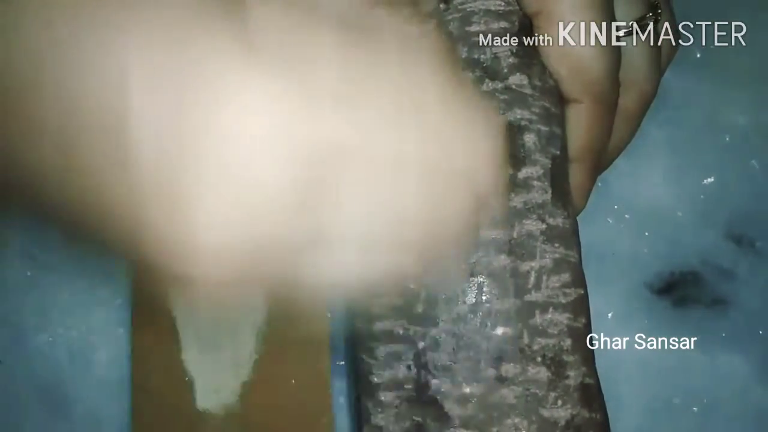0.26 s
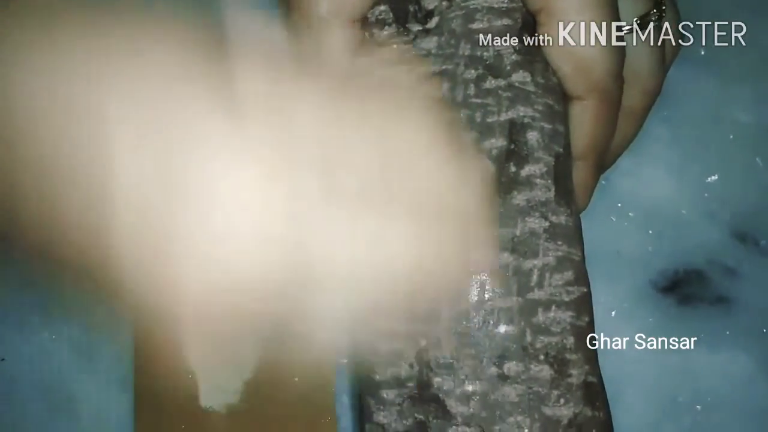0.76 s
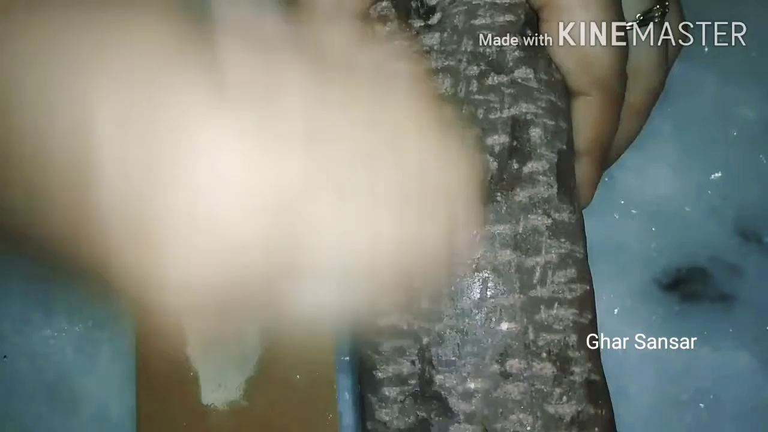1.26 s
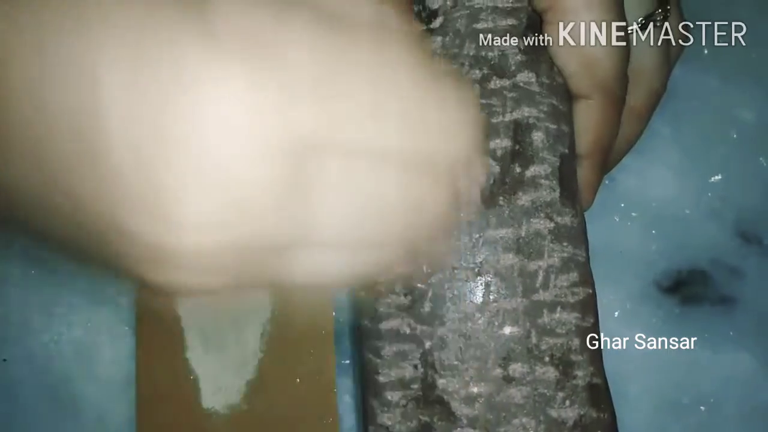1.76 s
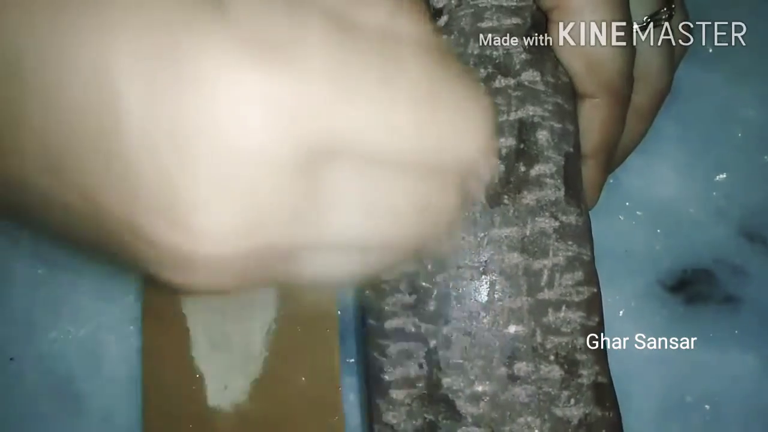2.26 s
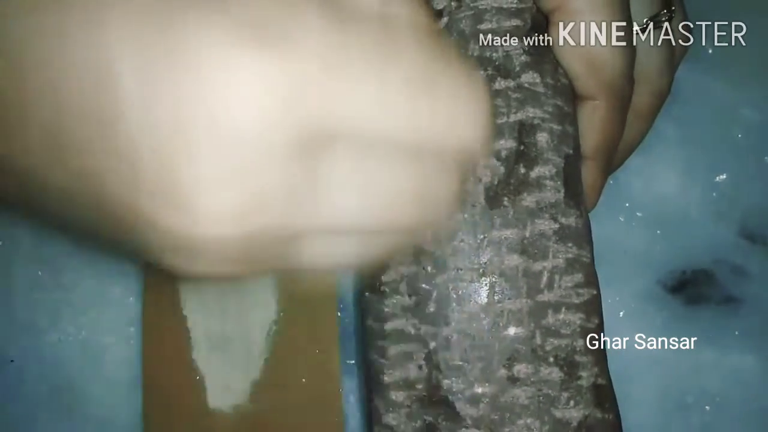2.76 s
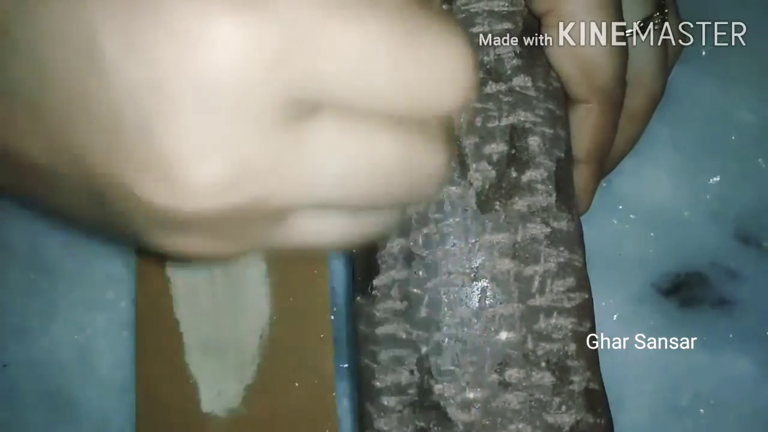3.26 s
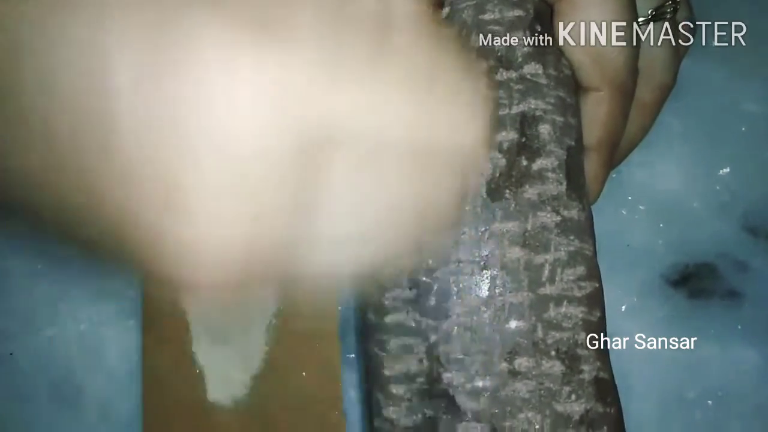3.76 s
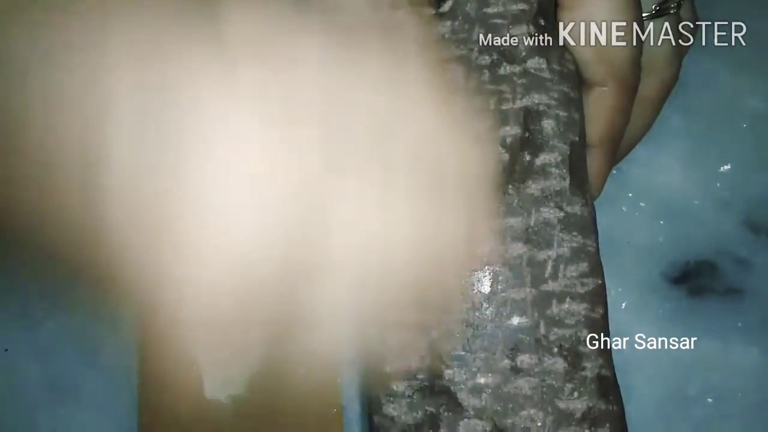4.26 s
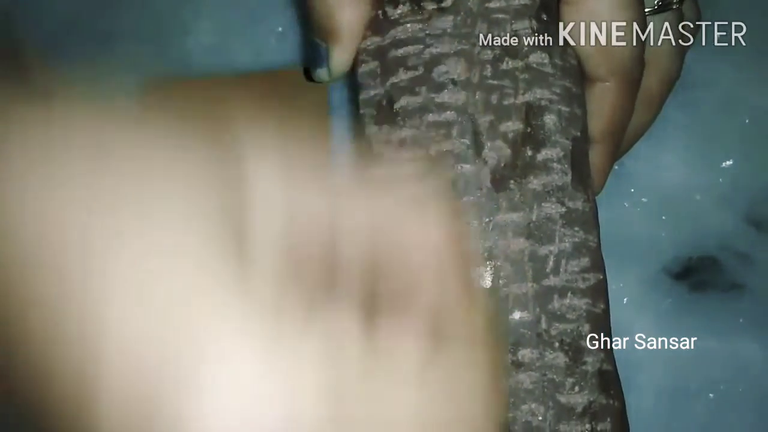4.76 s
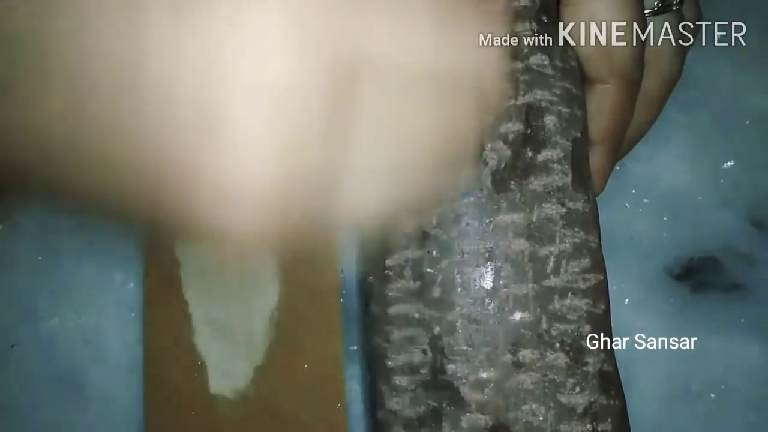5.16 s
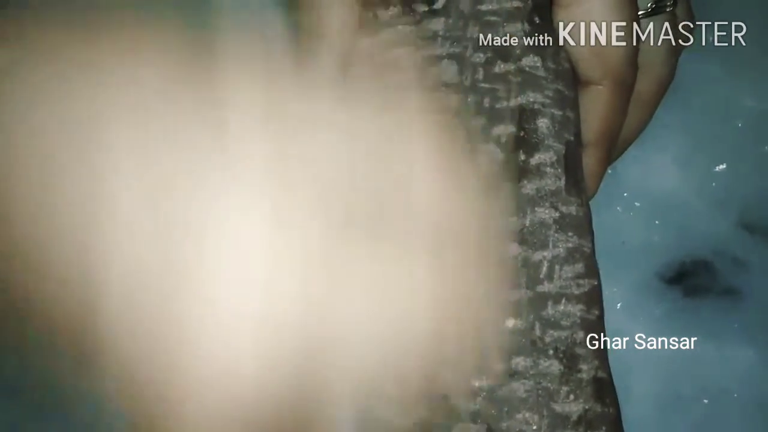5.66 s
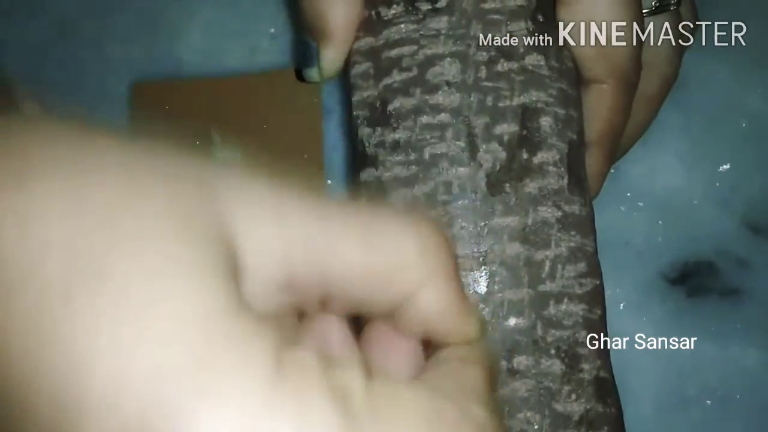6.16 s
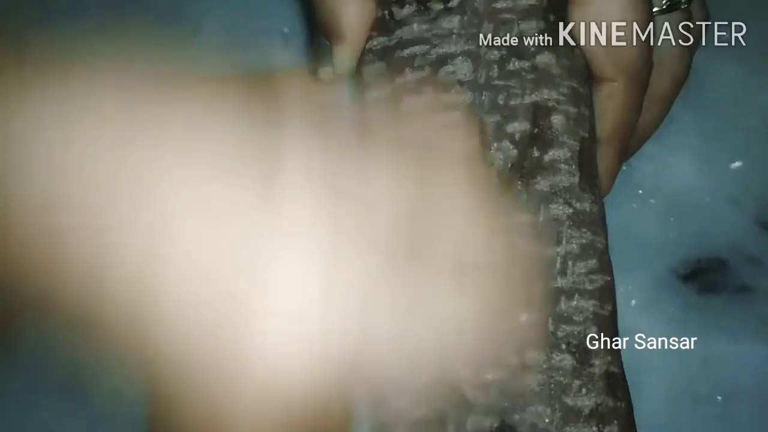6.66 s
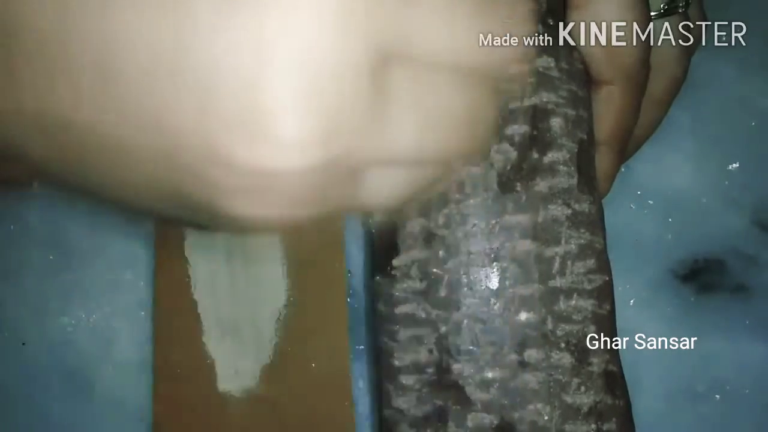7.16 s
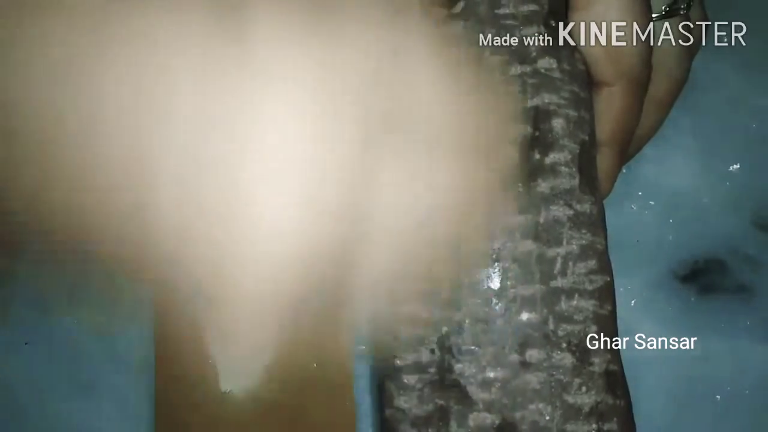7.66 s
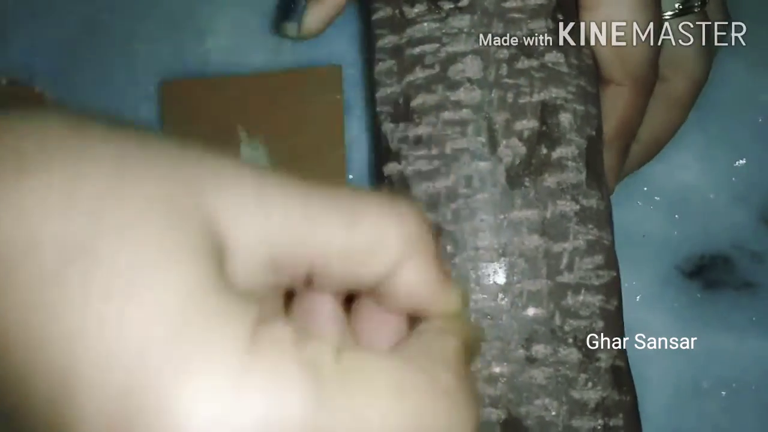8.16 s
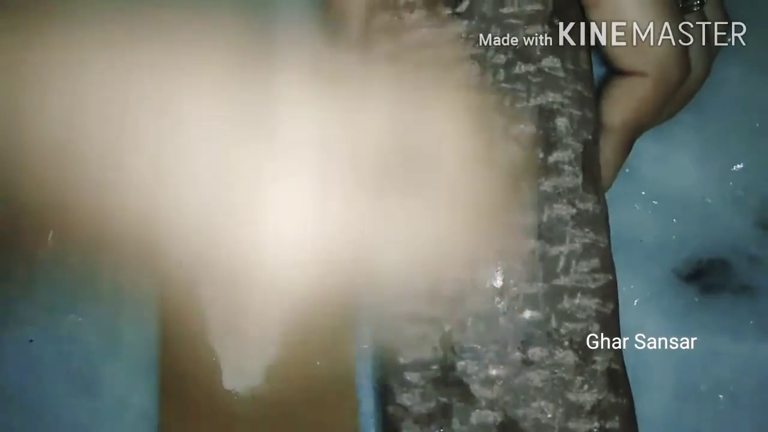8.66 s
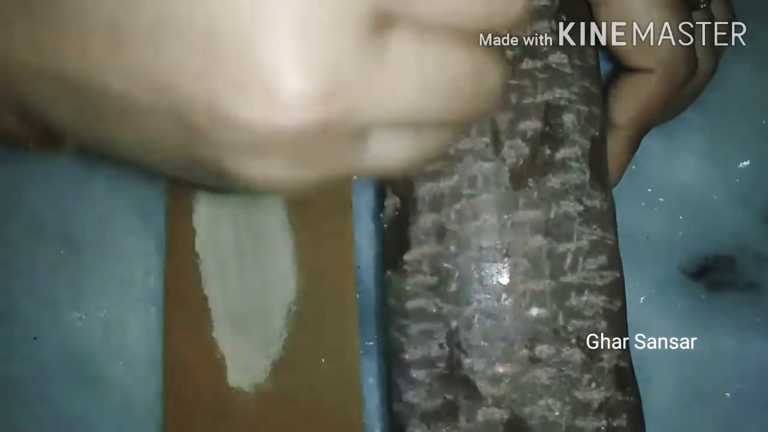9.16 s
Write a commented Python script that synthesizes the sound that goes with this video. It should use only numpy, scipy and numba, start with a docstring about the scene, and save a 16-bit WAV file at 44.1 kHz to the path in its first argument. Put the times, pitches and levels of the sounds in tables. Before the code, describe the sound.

Nonstop quick rubbing, over eight strokes a second: scratchy bursts with sharp ticks as a seed trips over stone ridges, separated by tiny dips at each turn. The sound is dry, hard and piercing in the upper midrange, with a hollow knock from the fist and a faint stony body. It quickens a little and grows stronger towards the end. Close microphone, short room tail, very faint low background hush.

```python
"""A hard seed in a cupped fist is rubbed up and down a pitted grinding stone, over eight strokes a second.
Excitation: it trips over a ridge every few milliseconds and grinds on grit in between.
Resonance: both set ringing the seed, the stone and the hollow of the hand, modelled as banks of
resonators whose frequencies and levels depend on the place on the stone and the direction of the stroke.
Background: a short room tail, a low murmur of air, soft rumbles and a faint mains hum."""
import sys
import numpy as np
from scipy import signal
from scipy.fft import rfft, irfft
from scipy.io import wavfile
from scipy.ndimage import uniform_filter1d, minimum_filter1d
from numba import njit

SR = 44100
rng = np.random.default_rng(int(sys.argv[2]) if len(sys.argv) > 2 else 0)


def int16_out(signal):
    """Quantize to a 16-bit WAV file."""
    q = np.round(np.clip(np.atleast_2d(signal).T, -1, 1) * 32767)
    wavfile.write(sys.argv[1], SR, q.astype(np.int16))


def volts_from_decibels(level):
    """Turn decibel levels (scalar or array-like) into linear amplitude factors."""
    exponent = np.asarray(level, float) / 20
    return 10 ** exponent


N = 414540
T = np.arange(N) / SR  # time [s]

# Strokes, away and back in turn: (t/s of the bite, pressed time/s, level/dB)
STROKES = [(0.02, 0.083, -19.5), (0.142, 0.082, -17), (0.268, 0.071, -17), (0.384, 0.076, -17),
           (0.525, 0.07, -18.5), (0.643, 0.083, -15.5), (0.78, 0.076, -19), (0.897, 0.1, -15),
           (1.02, 0.078, -17), (1.145, 0.092, -17.5), (1.271, 0.063, -17.5), (1.393, 0.071, -15.5),
           (1.514, 0.075, -19), (1.624, 0.09, -15), (1.751, 0.073, -19), (1.865, 0.092, -17),
           (2.001, 0.066, -18), (2.113, 0.095, -18), (2.246, 0.079, -16), (2.371, 0.095, -16.5),
           (2.492, 0.087, -15.5), (2.61, 0.094, -14.5), (2.744, 0.084, -17.5), (2.862, 0.081, -15.5),
           (2.993, 0.076, -18.5), (3.105, 0.11, -15), (3.228, 0.089, -16), (3.349, 0.067, -13),
           (3.471, 0.067, -18.5), (3.578, 0.094, -15.5), (3.702, 0.09, -19.5), (3.823, 0.085, -15.5),
           (3.94, 0.073, -18.5), (4.055, 0.092, -17), (4.175, 0.076, -15), (4.29, 0.088, -16),
           (4.407, 0.068, -19), (4.535, 0.078, -15), (4.642, 0.071, -15.5), (4.757, 0.094, -15),
           (4.869, 0.079, -17), (4.988, 0.092, -16.5), (5.097, 0.097, -19.5), (5.216, 0.086, -13.5),
           (5.351, 0.073, -18.5), (5.451, 0.096, -16.5), (5.569, 0.086, -20.5), (5.685, 0.091, -17),
           (5.804, 0.061, -19), (5.917, 0.083, -14.5), (6.027, 0.069, -17.5), (6.138, 0.081, -14),
           (6.258, 0.079, -17.5), (6.368, 0.08, -10.5), (6.478, 0.077, -21), (6.592, 0.096, -16.5),
           (6.695, 0.057, -17.5), (6.809, 0.073, -17.5), (6.912, 0.078, -18), (7.023, 0.082, -15),
           (7.139, 0.08, -19), (7.249, 0.092, -14), (7.358, 0.081, -17.5), (7.466, 0.079, -13),
           (7.588, 0.07, -18), (7.699, 0.065, -12.5), (7.814, 0.061, -18.5), (7.904, 0.087, -16),
           (8.018, 0.086, -17.5), (8.122, 0.072, -12.5), (8.251, 0.062, -19.5), (8.341, 0.08, -14.5),
           (8.463, 0.078, -19), (8.559, 0.093, -14), (8.673, 0.086, -17.5), (8.785, 0.077, -12.5),
           (8.901, 0.093, -17.5), (9.012, 0.086, -14), (9.125, 0.095, -17.5), (9.235, 0.08, -13.5),
           (9.352, 0.049, -17.5)]
# Hardest trips over a ridge, and lone catches as a stroke begins or ends:
# (t/s, level/dB of the push, relative to one that rings the seed to a peak of 1)
HARD_TRIPS = [(0.1482, -10), (0.1693, -6), (0.1884, -1.5), (0.1963, -4), (0.2095, -12), (0.219, -9),
              (0.4713, -12.5), (0.6512, -4.5), (0.6805, -3), (0.6881, -7), (0.9366, -2), (0.983, -10.5),
              (1.0443, -4.5), (1.174, -5), (1.1846, 2.5), (1.1908, -3), (1.4324, -4.5), (1.4525, -7),
              (1.5207, -12), (1.6291, -9.5), (1.6652, -0.5), (1.6791, 1), (1.7, -8), (1.7577, -19),
              (1.8296, -10), (1.8405, -11.0), (1.88, -8), (1.892, -6.5), (1.9119, -2.0), (1.9291, -7),
              (1.956, -6.5), (2.075, -15), (2.1473, -2), (2.157, -7), (2.1633, -1), (2.19, -4),
              (2.4169, 0.5), (2.4251, 2), (2.447, -7), (2.5378, -4), (2.5703, -6.5), (2.5938, -17),
              (2.6281, -2), (2.6656, -0.5), (2.6812, -4.5), (2.7118, -19), (2.91, 1), (2.9172, -7),
              (2.9258, -6), (3.157, 0.5), (3.1643, -5), (3.2004, -11.5), (3.313, -8), (3.3576, -7.5),
              (3.3734, -3), (3.611, -12), (3.6179, -1.5), (3.6328, 3), (3.64, 4), (3.6632, -8.5),
              (3.677, -17), (3.7065, -11), (3.7381, -2), (3.8675, 0.5), (4.089, -6), (4.095, 5.5),
              (4.1107, -6), (4.1186, -1.5), (4.1365, -14.5), (4.3329, 0.5), (4.3493, -2), (4.356, -3),
              (4.5435, -3), (4.5593, -2.5), (4.5817, -6.5), (4.614, -16), (4.6514, -5), (4.8064, 3),
              (4.8124, -9), (4.841, -17), (4.874, -16), (5.0262, 2.5), (5.049, -5), (5.1251, -10.5),
              (5.2432, -6), (5.2632, -3.5), (5.277, -7), (5.4598, -12), (5.4904, -7), (5.4972, 3),
              (5.5056, -8), (5.5119, 0.5), (5.5171, -1), (5.5367, -11), (5.5497, -13), (5.7297, 3),
              (5.7362, 4.5), (5.7411, 2), (5.8121, -8.5), (5.9445, -9), (5.9515, 7), (5.958, 4),
              (6.1542, -8), (6.1841, -4.5), (6.1912, -1.5), (6.4095, 0.5), (6.4253, -8), (6.6113, -3),
              (6.6232, 2), (6.6432, -6), (6.7045, -9.5), (6.8383, 1), (6.8511, -2), (6.8576, 6),
              (7.0281, -7), (7.0643, -4.5), (7.0773, -0.5), (7.2907, 6), (7.2983, -8), (7.3032, -3),
              (7.4713, -11), (7.495, 5), (7.5141, -3), (7.5261, 5.5), (7.5565, -15.5), (7.628, -2.0),
              (7.7199, 2), (7.7249, 0.5), (7.8741, -10), (7.9339, -2), (7.9375, -6), (8.1353, -5),
              (8.1492, 3), (8.159, -1.0), (8.1615, -0.5), (8.1705, -4), (8.1828, -8), (8.3717, 0.5),
              (8.3793, -1), (8.5876, 2), (8.599, -8), (8.6797, -20), (8.8005, 2), (8.8276, -5), (8.834, 5),
              (9.0348, 5), (9.0415, -3), (9.2452, -10), (9.2524, 1.0), (9.284, -3.5)]
# How the fist cups the seed: (t/s, hollow level/dB on the way out, hollow level/dB on the way back)
GRIP = [(0, -3, -4), (2, -2.5, -4.5), (3.5, -2, -7), (4.7, -3, -3.5), (5.3, -0.5, -4.5), (6.3, 1.5, -4),
        (7, 0.5, -2.5), (8, 2.5, -3), (9.4, 0, -3.5)]
# Modes of the seed, of the air in the fist and of the stone: (f/Hz, width/Hz of the narrower resonator,
# level/dB at the near end, level/dB at the far end, extra level/dB on the way out)
SEED_MODES = [(3919, 269, -5, -6.5, 3), (4339, 92, 9, 0, 1), (4651, 342, 3.5, 1.5, -0.5),
              (5378, 500, -1, 0, -1.5), (6210, 625, -10, -11.5, 0), (7174, 1400, -15, -21, -0.5),
              (10170, 1900, -29, -36.5, 4.5), (12200, 1100, -40, -45, 0), (13800, 3700, -49, -49, 5)]
HOLLOW_MODES = [(1643, 145, -23.5, -7, -3.5), (2362, 389, -0.5, 1, -5.5), (2842, 343, -11.5, 3.5, 6.5),
                (3280, 180, -3, -13, -6.5)]
STONE_MODES = [(157, 79, -30.5, -19.5, 5), (296, 65, -22, -25.5, 9.5), (354.4, 27.4, -16, -17.5, 9),
               (479, 38, -22, -19, 4), (567.5, 51, -26, -24, 6.5), (1020, 600, -21, -19, -4.5)]
# Spectral shape of the room's air: (f/Hz, relative density level/dB per Hz)
ROOM_AIR = [(30, -22), (60, -7.5), (100, -3.5), (350, -7.5), (560, -5.5), (700, -17), (1500, -11.5),
            (15000, -42)]
# Low drones from the house: (t/s of the middle, f/Hz, length/s between 1/e points, level/dB at the middle)
RUMBLES = [(0.45, 71, .4, -58), (3.75, 69, 0.47, -54), (4.8, 565, 1.6, -58), (8.665, 79, 0.038, -45)]

EASED_DB, BITE_S = -10, 0.011  # level change while eased off around a turn; time to press or ease
GRIT_AWAY_DB, GRIT_BACK_DB = -7.5, -9  # grit relative to the stroke level
GRIT_LUMP_DB = 3  # unevenness of the grit
RIDGE_AWAY_DB, RIDGE_BACK_DB = 11.5, 10.5  # largest lesser trip over the stroke level
RIDGE_GAP_S, RIDGE_SCATTER_DB = 0.007, 7
LESSER_HZ = 6500  # softer landing: the lesser trips lose treble above this
CONTACT_S = 0.00033  # decay constant of the crumble after an impact
SNAP_HZ, SNAP_WIDTH_HZ, SNAP_DB = 4630, 1940, -14.5  # bare click of each trip
SEED_GLIDE, HOLLOW_GLIDE, STONE_GLIDE = 0.014, 0.052, 0.0072  # relative rise in f, near to far end
FIST_SHIFT_DB = 1.5  # random drift of the hollow's level
ROOM_T60_S, ROOM_DB = 0.14, -16
ROOM_AIR_DB, AIR_SWELL_DB = -52, 2  # mean level of the hush and its drift
HUM_HZ, HUM_DB = 101, -69


def rubbing():
    """Source and resonator: broadband friction and impacts drive the modes of seed, hollow and stone."""
    speed, place, away, stroke_db, hollow_db = hand()

    # the seed's impulse response at mid-stone sets the scale of both excitations
    impulse = np.eye(1, 2048)[0]
    seed_response = ring(impulse, SEED_MODES, np.full(2048, 0.5), 0, 0)
    hard_s, hard_db = np.transpose(HARD_TRIPS)
    hard = knocks(hard_s, volts_from_decibels(hard_db))
    lesser_top_db = stroke_db + np.where(away, RIDGE_AWAY_DB, RIDGE_BACK_DB)
    lesser = knocks(*ridges(speed, lesser_top_db))
    lesser = signal.lfilter(*signal.butter(1, LESSER_HZ, fs=SR), lesser)
    trips = (hard + lesser) / np.abs(seed_response).max()
    grit_db = stroke_db + np.where(away, GRIT_AWAY_DB, GRIT_BACK_DB)
    grind = grit(speed, grit_db) / np.sqrt(np.sum(seed_response ** 2))

    # air in the fist and the heavy stone answer less to the trips than the hard seed does
    seed = ring(grind + trips, SEED_MODES, place, away, SEED_GLIDE)
    hollow_gain = volts_from_decibels(hollow_db + FIST_SHIFT_DB * walk(9))
    hollow_force = (grind + volts_from_decibels(-1) * trips) * hollow_gain
    hollow = ring(hollow_force, HOLLOW_MODES, place, away, HOLLOW_GLIDE)
    stone = ring(grind + volts_from_decibels(-6) * trips, STONE_MODES, place, away, STONE_GLIDE)
    snap = mode(mode(trips, SNAP_HZ, SNAP_WIDTH_HZ), SNAP_HZ, SNAP_WIDTH_HZ)
    return volts_from_decibels(SNAP_DB) * snap + seed + hollow + stone


def hand():
    """Sinusoidal reciprocation: speed 0-1, place 0-1, whether away, stroke dB and hollow dB over time."""
    bite, length, level_db = np.transpose(STROKES)
    ease = bite + length
    # the hand turns halfway between easing off and biting again
    turns = (ease[:-1] + bite[1:]) / 2
    turns = np.r_[2 * turns[0] - turns[1], turns, 2 * turns[-1] - turns[-2]]
    count = np.interp(T, turns, np.arange(len(turns)))
    which = np.minimum(count.astype(int), len(bite) - 1)
    swing = np.pi * count
    speed = np.abs(np.sin(swing))
    place = (1 - np.cos(swing)) / 2
    away = np.sin(swing) > 0

    contact = (T > bite[which]) & (T < ease[which])
    pressed = uniform_filter1d(1.0 * contact, int(BITE_S * SR))
    stroke_db = level_db[which] + EASED_DB * (1 - pressed)

    middle = bite + length / 2
    grip_s, out_db, back_db = np.transpose(GRIP)
    going_back = np.arange(len(bite)) % 2
    grip_db = np.where(going_back, np.interp(middle, grip_s, back_db), np.interp(middle, grip_s, out_db))
    return speed, place, away, stroke_db, np.interp(T, middle, grip_db)


def ridges(speed, top_db):
    """Quasi-periodic impacts: lesser trips at a loose beat, silent near hard ones, stronger with speed."""
    chance = rng.standard_normal((2000, 2))
    times = np.cumsum(RIDGE_GAP_S * np.exp(0.18 * chance[:, 0]))
    at = np.minimum((times * SR).astype(int), N - 1)
    hard_s = np.array(HARD_TRIPS)[:, 0]
    to_hard_s = np.abs(times[:, None] - hard_s).min(axis=1)
    free = (to_hard_s > 0.6 * RIDGE_GAP_S) & (times < N / SR)
    size_db = top_db[at] - RIDGE_SCATTER_DB * np.abs(chance[:, 1])
    return times, free * volts_from_decibels(size_db) * speed[at] ** 1.28


def knocks(times, sizes):
    """Contact impulse: a sharp edge, then a decaying random crumble that differs every time."""
    lag = np.arange(48)
    crumble = rng.standard_normal((len(times), len(lag)))
    push = 0.19 * crumble * np.exp(-lag / (CONTACT_S * SR))
    push[:, 0] = 1
    force = np.zeros(N + len(lag))
    at = np.clip((np.asarray(times) * SR).astype(int), 0, N - 1)
    np.add.at(force, at[:, None] + lag, sizes[:, None] * push)
    return force[:N]


def grit(speed, grind_db):
    """Friction noise: dense uneven grains, louder with speed; a faint drag lasts through the turn."""
    grains = rng.standard_normal(N) * volts_from_decibels(GRIT_LUMP_DB * walk(300))
    drag = volts_from_decibels(-31.5)
    return grains * volts_from_decibels(grind_db) * (speed ** 1.42 + drag)


def ring(force, modes, place, away, glide):
    """Modal superposition: place and direction set each mode's level, place its pitch."""
    out = 0
    for k, (hz, width_hz, near_db, far_db, out_db) in enumerate(modes):
        now_hz = hz * (1 + glide * (place - 0.5))
        pushed = force * volts_from_decibels(near_db + (far_db - near_db) * place + out_db * away)
        narrow = moving_mode(pushed, now_hz, 1.0 * width_hz)
        sign = (-1) ** k  # neighbouring modes swing in opposite phase
        out = out + sign * moving_mode(narrow, now_hz, 3.1 * width_hz)
    return out


@njit
def moving_mode(x, hz, width_hz):
    """Damped resonator with a movable centre: two trapezoidal integrators, gain 1 at the centre."""
    y, band, low = np.empty(len(x)), 0.0, 0.0
    for i in range(len(x)):
        g = np.tan(np.pi * hz[i] / SR)
        damping = width_hz / hz[i]
        v = (band + g * (x[i] - low)) / (1 + g * (g + damping))
        band = 2 * v - band
        low = low + 2 * g * v
        y[i] = damping * v
    return y


def mode(x, hz, width_hz):
    """Damped resonator with a fixed centre, gain 1 at that centre."""
    return signal.lfilter(*signal.iirpeak(hz, hz / width_hz, fs=SR), x)


def walk(rate):
    """Slow random modulation: Gaussian values, `rate` per second, joined by straight slews."""
    k = int(SR / rate)
    held = np.repeat(rng.standard_normal(N // k + 1), k)
    return uniform_filter1d(held, k)[:N]


def room(x):
    """Diffuse reverberation: convolution with exponentially decaying noise of unit energy."""
    t = T[:SR // 2]
    onset = np.minimum(t / 0.00043, 1)
    tail = rng.standard_normal(len(t)) * volts_from_decibels(-60 * t / ROOM_T60_S) * onset
    return volts_from_decibels(ROOM_DB) * signal.fftconvolve(x, tail / np.sqrt(np.sum(tail ** 2)))[:N]


def room_air():
    """Spectrally shaped noise: the low hush of the house, its level drifting slowly."""
    hz, db = np.transpose(ROOM_AIR)
    bins_hz = np.maximum(np.fft.rfftfreq(N, 1 / SR), 1)
    shape = volts_from_decibels(np.interp(np.log(bins_hz), np.log(hz), db))
    hush = irfft(rfft(rng.standard_normal(N)) * shape, N)
    return volts_from_decibels(ROOM_AIR_DB + AIR_SWELL_DB * walk(3.29)) * hush / hush.std()


def rumbles():
    """Narrow-band noise under Gaussian envelopes: soft low drones that come and go."""
    noise = rng.standard_normal(N)
    out = 0
    for middle_s, hz, length_s, db in RUMBLES:
        low = mode(mode(noise, hz, 25), hz, 25)
        swell = np.exp(-((T - middle_s) / length_s * 2) ** 2)
        out = out + volts_from_decibels(db) * low / low.std() * swell
    return out


def mains_hum():
    """Pure tone: a faint sinusoid of slowly drifting level."""
    tone = np.sqrt(2) * np.sin(2 * np.pi * HUM_HZ * T)  # rms 1
    return volts_from_decibels(HUM_DB + 1.9 * walk(3.9)) * tone


def scene():
    """Linear superposition of the rubbing, its room tail and the background."""
    near = rubbing()
    return (near + room(near) + room_air() + rumbles() + mains_hum())[None]


def low_pass(x):
    """Removes everything above the highest recorded frequency."""
    return signal.sosfilt(signal.butter(12, 15970, fs=SR, output="sos"), x)


def record(dry):
    """Peak limiting with look-ahead: the gain falls before the hardest ticks can pass the ceiling."""
    ceiling = 0.95  # of full scale
    span = int(0.001 * SR)  # 1 ms
    gain = minimum_filter1d(ceiling / np.maximum(np.abs(dry), ceiling), 2 * span + 1)
    gain = uniform_filter1d(uniform_filter1d(gain, span), span)
    return low_pass(gain * dry)


dry = scene()
out = record(dry)
int16_out(out)
```